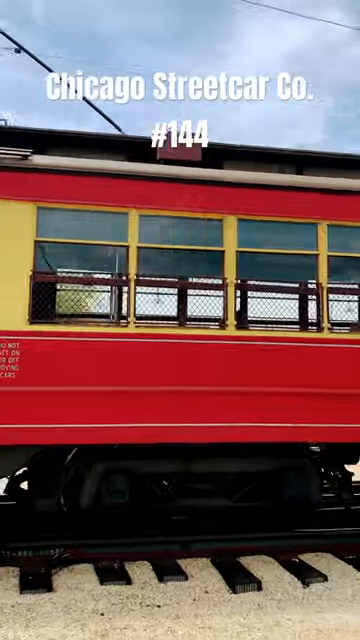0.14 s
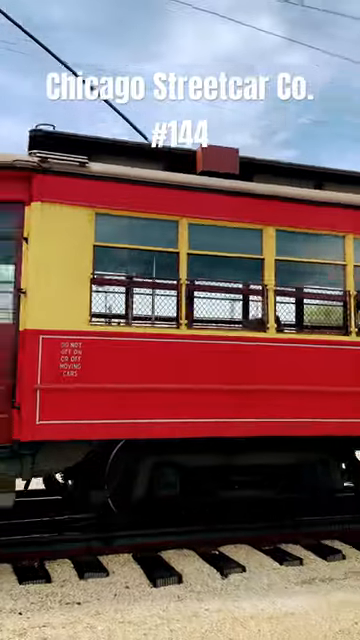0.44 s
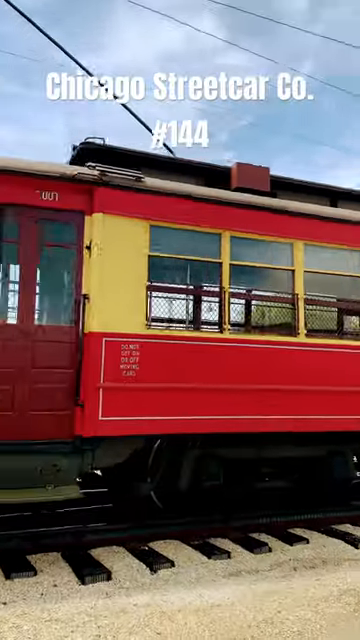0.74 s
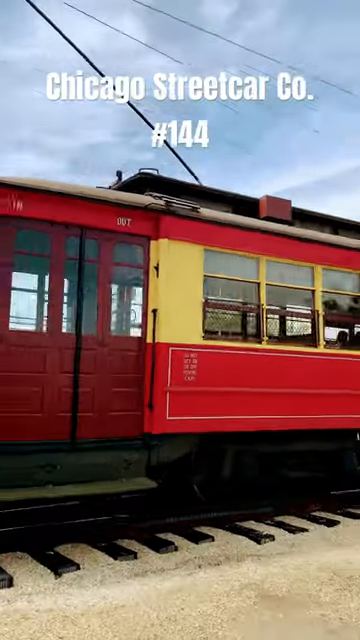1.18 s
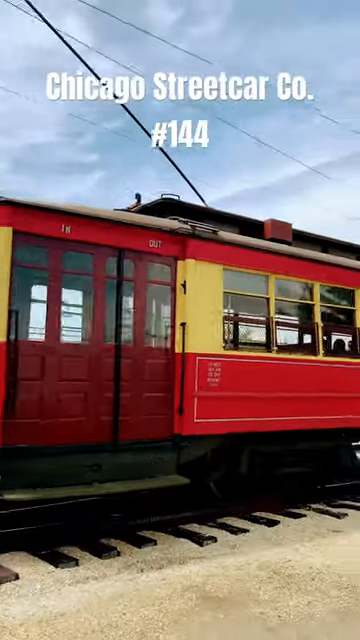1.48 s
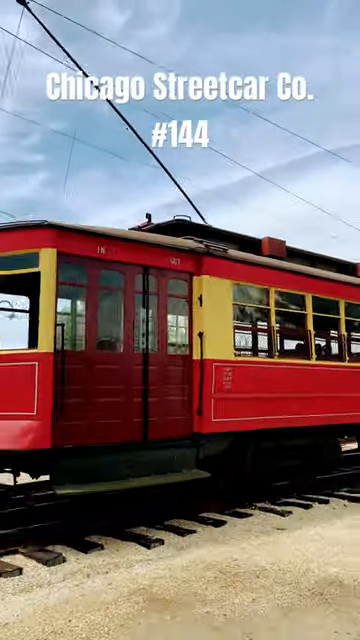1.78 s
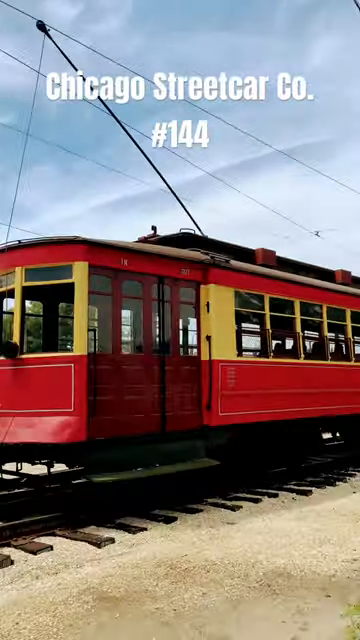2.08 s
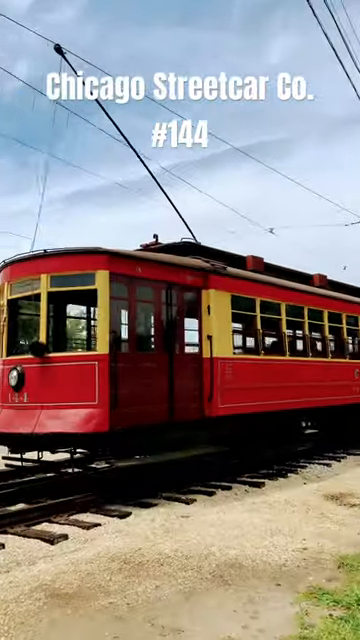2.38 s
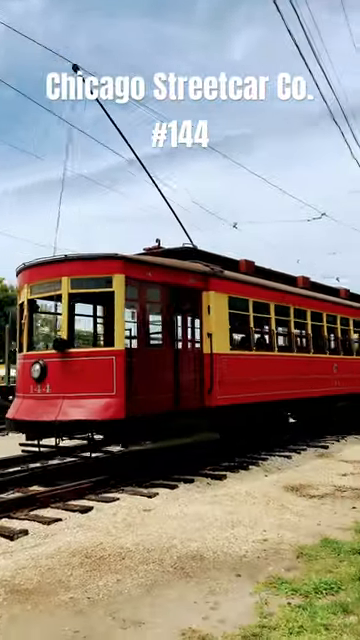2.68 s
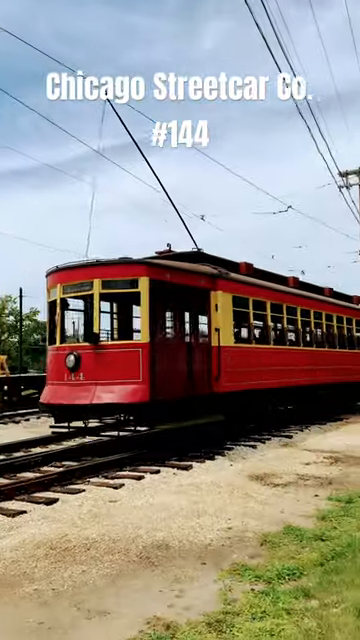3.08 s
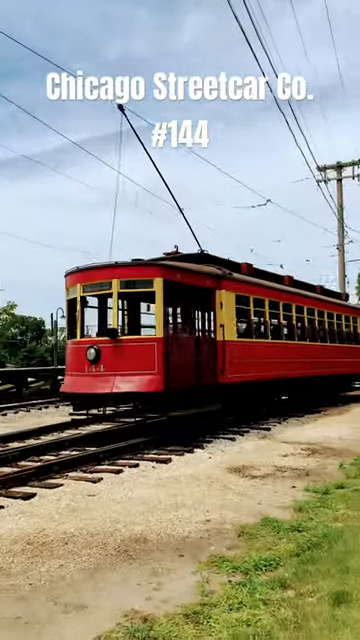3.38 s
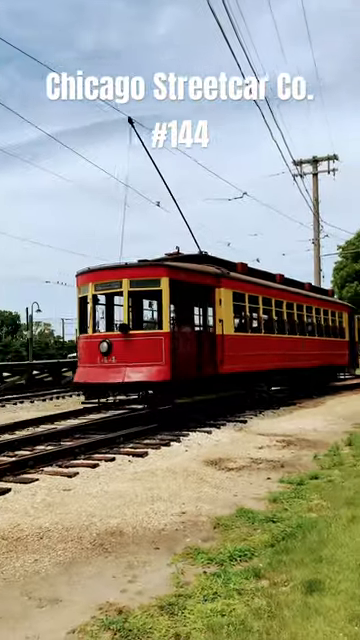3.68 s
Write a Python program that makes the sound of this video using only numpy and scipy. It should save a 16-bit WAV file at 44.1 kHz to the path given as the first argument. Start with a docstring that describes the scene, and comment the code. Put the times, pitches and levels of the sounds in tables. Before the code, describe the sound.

Close stereo pickup of a vintage tram on outdoor track: continuous body rumble, soft roar and hiss, irregular booming wheel knocks, loose fittings rattling, grit snapping early, short squeaks midway and a strong groan late.

```python
"""An old streetcar rolls slowly past outdoors, close to a two-port microphone.
Noise and tiny impacts, coloured by ground, body and wheels, make the rumble, roar and hiss; wheel knocks
add decaying booms, shudder and chatter. Stick-slip tones groan and squeak; narrow and broad bands ring.
Loose metal fittings chink as dense high rattle, and grit cracks under a wheel as short noise bursts.
The ports hear it with differing phase and balance, plus sound scattered by the moving car side."""
import sys
import numpy as np
from scipy import signal
from scipy.fft import rfft, irfft
from scipy.io import wavfile
from scipy.ndimage import uniform_filter1d

SR = 44100
rng = np.random.default_rng(int(sys.argv[2]) if len(sys.argv) > 2 else 0)


def generate_wav(sig):
    """Save sig (samples, or channels by samples) to the path in sys.argv[1] as 16-bit PCM at SR."""
    pcm = np.round(np.clip(np.atleast_2d(sig).T, -1, 1) * 32767).astype(np.int16)
    wavfile.write(sys.argv[1], SR, pcm)


N = 169344
T = np.arange(N) / SR  # time in s
HZ = np.fft.rfftfreq(N, 1 / SR)

# Ringing of wheels, flanges and panels, and two broad, breathy whistles near 4.5 kHz:
# peak_s, half_length_s, pitch_hz, width_hz, level_db
RINGS = [(1.254, 0.24, 368, 22, -28.5), (0.776, 0.097, 467, 18, -34.5), (3.12, 0.16, 467, 14, -36.5),
         (3.29, 0.25, 189, 9.7, -28.5), (3.69, 0.25, 291, 15, -31.5), (1.7, 3.9, 684, 41, -44.5),
         (2.6, 0.21, 4480, 750, -39), (3.75, 0.18, 4500, 750, -41)]
# Loose fittings struck: start_s, level_db (before CHINK_DB), rise_s, t60_s
CHINKS = [(0.174, -23, 0.0033, 0.13), (0.227, -26.5, 0.0052, 0.19), (.595, -40, .03, 0.43),
          (1.565, -32, 0.017, 0.12), (1.928, -29, .005, 0.26), (1.98, -31, .002, 0.14),
          (2.42, -45, 0.026, 0.33), (2.882, -38, .014, 0.39)]
# Grit under a wheel: start_s, snap_db, crumble_db
CRACKS = [(.6905, -15.5, -28), (.7355, -19.5, -34), (.782, -15, -26)]
# Flanges brushing the rail: peak_s, half_length_s, pitch_hz, level_db
SQUEAKS = [(1.761, 0.01, 1652, -32), (1.858, 0.014, 1625, -32), (3.113, 0.012, 4570, -33),
           (3.152, 0.015, 4570, -35)]
# Stick-slip of wheel and rail: peak_s, rise_s, fall_s, pitch_hz, glide_hz_per_s, level_db
GROANS = [(.12, 0.1, 0.036, 692, -11, -34.5), (.5, 0.052, 0.033, 686, 1.5, -33.5),
          (0.647, 0.04, 0.049, 681, 240, -23), (2.05, 0.023, 0.02, 690, 2.5, -32),
          (2.195, 0.041, 0.028, 688, 0, -31), (2.62, 0.025, 0.068, 690, 3, -37.5),
          (2.785, 0.042, 0.036, 679.5, -100, -30.5), (3.002, 0.065, 0.026, 469.6, 90, -15.5)]
# Wheels striking joints and dents: start_s, thud_db (before BOOM_DB, SHUDDER_DB), clack_db, t60_s, pitch_hz
KNOCKS = [(0.024, -14, -37, 0.09, 153), (.128, -20, -25, 0.14, 233), (.143, -9.5, -21.5, 0.1, 327),
          (.170, -11.5, -26, 0.32, 132.7), (0.446, -16, -28, 0.091, 106), (0.636, -15, -45, 0.21, 138),
          (1.116, -12, -24, 0.13, 192), (1.140, -12.5, -20.5, 0.08, 185), (1.408, -20.5, -25, 0.73, 202.3),
          (1.439, -19, -25.5, 0.27, 247), (1.476, -15.5, -28, 0.26, 143.6), (1.549, -15, -25, 0.27, 200),
          (1.611, -12.5, -32, .14, 154.5), (1.641, -17, -48, .08, 128), (1.88, -15.5, -21.5, 0.3, 300.5),
          (1.913, -19, -36, 1, 147), (2.068, -22, -24.5, 0.12, 143), (2.09, -15, -45, 0.17, 113),
          (2.309, -17, -27.5, 0.24, 125), (2.345, -16.5, -27.5, 0.24, 153), (2.478, -19.5, -32, 0.26, 131),
          (3.189, -17.5, -36, 0.18, 195), (3.429, -17.5, -31, 0.22, 190)]

# Rolling levels before jolts and trims, for ground, car body, wheel roar and rail hiss: time_s, level_db
GROUND_LEVEL = [(0, -31.5), (0.7, -26), (1.75, -32), (1.95, -25.5), (2.95, -27.5), (3.15, -33),
                (3.84, -31.5)]
BODY_LEVEL = [(0.0, -19), (0.35, -24), (0.58, -20), (0.96, -24), (1.48, -20.5), (1.67, -33), (1.89, -20.5),
              (2.06, -23), (2.31, -26), (2.45, -27), (2.69, -29), (2.85, -21), (3.31, -27), (3.84, -26.5)]
ROAR_LEVEL = [(0.0, -27.5), (0.2, -33.5), (0.59, -32), (0.77, -35), (1.1, -35), (1.85, -38.5), (1.96, -36),
              (2.69, -38.5), (3.0, -35.5), (3.84, -37.5)]
HISS_LEVEL = [(0, -33.5), (.55, -32), (.66, -31), (.82, -34), (.9, -37.5), (1.38, -39), (1.47, -35),
              (1.8, -36.5), (1.94, -31.5), (2.15, -36), (2.47, -34), (2.75, -36.5), (2.97, -33), (3.2, -35),
              (3.84, -36)]

# Relative spectra of each source: frequency_hz, level_db
CHINK_COLOUR = [(1000, -45), (5000, -0.5), (8500, -10), (10200, -0.5), (10900, 0), (12600, -2), (13600, -2),
                (14900, 0), (15700, -5.5)]
CRACK_COLOUR = [(800, 1), (2500, -4), (4200, 5), (5700, 6.5), (7500, 2), (10000, 0.5), (12500, -8),
                (15500, -15)]
SCRAPE_COLOUR = [(300, -12), (800, 3.5), (1800, -8), (4000, -23)]
SHUDDER_COLOUR = [(22, -41), (70, -13), (110, 0.5), (145, 12), (200, 0), (300, 1), (400, -7), (530, -22),
                  (1800, -80)]
CLACK_COLOUR = [(100, -30), (330, 11), (530, 2.5), (780, 8.5), (1100, 0.5), (1800, -2), (2700, -13.5),
                (6000, -17.5), (14000, -43)]
GROUND_COLOUR = [(15, -38), (30, -23), (48, 2.5), (62, 4), (78, 9), (100, 10), (130, -17), (250, -78)]
BODY_COLOUR = [(25, -45), (85, -15.5), (115, -6.5), (137, 2.5), (175, -4), (220, -6.5), (300, -8),
               (370, -11.5), (440, -19), (560, -24.5), (900, -34.5), (4000, -72)]
ROAR_COLOUR = [(40, -30), (250, 8), (480, -1.5), (580, -6), (700, 1.5), (850, 0), (1050, -4.5),
               (1500, -3.5), (2000, -7), (2700, -12), (5000, -58)]
HISS_COLOUR = [(1000, 6.5), (2200, 4.5), (3000, 4), (3800, 7), (5300, 4), (7100, 5), (8500, -2.5),
               (10200, -3.5), (12000, -11), (14300, -14.5), (15500, -33)]

# Steel resonances of small fittings and of wheels: frequency_hz, width_hz, boost_db
FITTING_MODES = [(10778, 25, 12), (11520, 90, 4), (12596, 90, 6), (14857, 16, 10)]
WHEEL_MODES = [(1163, 32, 3), (2080, 32, 4), (2494, 60, 4), (3468, 50, 4), (7077, 40, 4)]

# Phase between the two ports, positive where the left leads: frequency_hz, phase_rad
PORT_PHASE = [(20, 0), (1450, -.1), (1900, .9), (2600, 2.3), (3500, 1.6), (4050, 2.2), (4823, 3.14),
              (5600, 4.4), (6976, 6.28), (8957, 9.42), (11111, 12.57), (13092, 15.7), (15503, 18.9)]
# Level difference between the ports: frequency_hz, left_minus_right_db
PORT_BALANCE = [(50, -1.1), (260, -2), (370, -2), (480, 4.5), (580, -5), (680, -7.5), (820, 1),
                (1000, -0.7), (2500, -0.5), (4000, 2.1), (15000, -0.5)]
# Scattered sound against direct sound: frequency_hz, level_db
SCATTER = [(40, -8), (150, -21.5), (700, -17), (1200, -9), (2200, -5), (3200, -5), (4800, -28), (5700, -8),
           (7000, -17), (8000, -7), (9000, -32), (10000, -6), (15000, -11)]

CHINK_DB = 1
SNAP_T60_S, CRUMBLE_T60_S, CRUMBLE_TOP_HZ = 0.02, 0.26, 7000
SQUEAK_WAVER, SQUEAK_WAVER_HZ = 0.0082, 200  # fraction of the pitch, rate
GROAN_WAVER, GROAN_WAVER_HZ = 0.01, 70  # fraction of the pitch, rate
OCTAVE_DB, SCRAPE_DB = -31, -14
KNOCK_RISE_S, STEADY_S = 0.003, 0.0077
BOOM_DB, SHUDDER_DB = -3, -2
GRAIN_PER_S, GRAIN_SPREAD_DB = 900, 1.5
SCATTER_T60_S, SCATTER_SHIFT_HZ = 0.062, 37
BASS_CUT_HZ, EDGE_HZ = 40, 15800
OVERLOAD = 0.9  # ceiling of the soft overload, full scale = 1


def amp(db):
    """Decibels to gain."""
    return 10 ** (np.asarray(db) / 20)


def unit(x):
    """Scales to rms 1."""
    return x / np.sqrt(np.mean(x ** 2) + 1e-20)


def read(points):
    """A table over frequency, joined on a log axis."""
    f, value = np.transpose(points)
    return np.interp(np.log(HZ + 1), np.log(f + 1), value)


def level(points):
    """A dB curve over time as gain."""
    return amp(np.interp(T, *np.transpose(points)))


def colour(x, points):
    """Filters x by a relative spectrum, at rms 1."""
    return unit(irfft(rfft(x) * amp(read(points)), N))


def drift(rate_hz):
    """Slow chance movement up to a rate, at rms 1."""
    return unit(irfft(rfft(rng.standard_normal(N)) / (1 + (HZ / rate_hz) ** 4), N))


def grains(per_s, spread_db, smooth):
    """Tiny impacts of uneven size over a smooth share of noise."""
    struck = rng.random(N) < per_s / SR
    sign = rng.choice([-1, 1], N)
    size = amp(spread_db * np.minimum(rng.exponential(1, N), 4))
    return unit(struck * sign * size) + smooth * rng.standard_normal(N)


def blow(start, rise, t60):
    """Envelope of a quick rise and an exponential decay."""
    age = T - start
    return np.clip(age / rise, 0, 1) * amp(-60 * np.maximum(age - rise, 0) / t60)


def swell(peak, rise, fall):
    """A bell-shaped envelope with its own rise and fall."""
    return np.exp(-((T - peak) / np.where(T < peak, rise, fall)) ** 2)


def steady(x, window_s):
    """Evens out the level over a short window."""
    power = abs(uniform_filter1d(x ** 2, size=max(int(window_s * SR), 8)))
    return x / np.sqrt(power + 1e-12)


def patchy(x, depth_db, rate_hz):
    """Neighbouring bands swell and sink on their own."""
    spectrum, centres = rfft(x), np.linspace(0, SR / 2, 20)
    out = np.zeros(N)
    for hz in centres:
        band = np.maximum(1 - abs(HZ - hz) / centres[1], 0)  # overlapping triangles
        out += irfft(spectrum * band, N) * amp(depth_db * drift(rate_hz))
    return unit(out)


def steel(x, modes, ripple_db, spacing_hz):
    """A few clear resonances and many weak, close ones colour the sound."""
    smoother = np.hanning(int(spacing_hz / HZ[1]) + 3)
    ripple = unit(signal.oaconvolve(rng.standard_normal(len(HZ)), smoother, "same"))
    peaks = 1 + sum((amp(db) - 1) / (1 + 2j * (HZ - hz) / width) for hz, width, db in modes)
    return irfft(rfft(x) * peaks * amp(ripple_db * ripple), N)


def rings():
    """Resonances, narrow or broad, swell and fade as the car moves."""
    out = np.zeros(N)
    for s, half, hz, width, db in RINGS:
        turn = 2 * np.pi * hz * T
        ring = drift(width / 2) * np.sin(turn) + drift(width / 2) * np.cos(turn)
        out += amp(db) * swell(s, half, half) * ring
    return out


def chinks():
    """Small steel parts rattle with a high, dense ring."""
    force = amp(CHINK_DB) * sum(amp(db) * blow(s, rise, t60) for s, db, rise, t60 in CHINKS)
    impacts = colour(grains(per_s=3400, spread_db=-2.0, smooth=0.68), CHINK_COLOUR)
    rattle = steel(impacts, FITTING_MODES, ripple_db=6, spacing_hz=250)
    return force * patchy(steady(rattle, window_s=0.018), depth_db=4.5, rate_hz=150)


def cracks():
    """A grain of grit snaps, then crumbles more dully."""
    snap = sum(amp(db) * blow(s, 0.00026, SNAP_T60_S) for s, db, _ in CRACKS)
    crumble = sum(amp(db) * blow(s, 0.0053, CRUMBLE_T60_S) for s, _, db in CRACKS)
    crumbs = colour(grains(per_s=450, spread_db=0.5, smooth=1.0), CRACK_COLOUR)
    dull_crumbs = unit(irfft(rfft(crumbs) / np.hypot(1, HZ / CRUMBLE_TOP_HZ), N))
    return snap * colour(rng.standard_normal(N), CRACK_COLOUR) + crumble * dull_crumbs


def squeaks():
    """Flanges brush the rail in thin, unsteady tones."""
    wavering_time = np.cumsum(1 + SQUEAK_WAVER * drift(SQUEAK_WAVER_HZ)) / SR
    tones = np.zeros(N)
    for s, half, hz, db in SQUEAKS:
        tone = np.sqrt(2) * np.sin(2 * np.pi * hz * wavering_time)
        tones += amp(db) * swell(s, half, half) * tone
    return tones * amp(2 * drift(rate_hz=130))


def groans():
    """A slipping wheel builds up one low mode, then lets go; it flutters, and scrapes once in every cycle."""
    out, waver = np.zeros(N), 1 + GROAN_WAVER * drift(GROAN_WAVER_HZ)
    scrape = amp(SCRAPE_DB) * colour(rng.standard_normal(N), SCRAPE_COLOUR)
    for s, rise, fall, hz, glide, db in GROANS:
        turn = 2 * np.pi * np.cumsum((hz + glide * (T - s)) * waver) / SR
        tone = np.sqrt(2) * (np.sin(turn) + amp(OCTAVE_DB) * np.sin(2 * turn))
        out += amp(db) * swell(s, rise, fall) * (tone + scrape * (1 + np.cos(turn)))
    return out * amp(0.7 * drift(rate_hz=90))


def knocks():
    """Each blow booms in one panel and shakes the whole truck, while the wheel clacks and chatters."""
    shudder = steady(colour(grains(per_s=500, spread_db=2.0, smooth=0.63), SHUDDER_COLOUR), STEADY_S)
    chatter = steady(colour(grains(per_s=700, spread_db=0.5, smooth=0.96), CLACK_COLOUR), STEADY_S)
    wobble = 0.52 * drift(rate_hz=28)  # phase in radians
    boom, thud_power, clack_power = np.zeros(N), np.zeros(N), np.zeros(N)
    for s, thud_db, clack_db, t60, hz in KNOCKS:
        force = blow(s, KNOCK_RISE_S, t60)
        boom += amp(thud_db) * force * np.sin(2 * np.pi * hz * (T - s) + wobble)
        thud_power += (amp(thud_db) * force) ** 2  # overlapping blows add as power
        clack_power += (amp(clack_db) * force) ** 2
    shaking = amp(SHUDDER_DB) * np.sqrt(thud_power) * shudder
    return amp(BOOM_DB) * boom + shaking + np.sqrt(clack_power) * chatter


def ground_rumble():
    """Rough rail drives the ground: steadied low noise."""
    return level(GROUND_LEVEL) * steady(colour(rng.standard_normal(N), GROUND_COLOUR), window_s=0.098)


def body_rumble(jolt):
    """Rough rail drives the car body: small impacts rumble in its low resonances."""
    impacts = grains(GRAIN_PER_S, GRAIN_SPREAD_DB, smooth=0.74)
    rumble = steady(colour(impacts, BODY_COLOUR), window_s=0.09)
    return level(BODY_LEVEL) * amp(-0.5 + 1.05 * jolt) * rumble


def wheel_roar(jolt):
    """Rough rail drives the wheels: small impacts roar in the middle range."""
    impacts = grains(GRAIN_PER_S, GRAIN_SPREAD_DB, smooth=0.92)
    return level(ROAR_LEVEL) * amp(0.64 * jolt) * colour(impacts, ROAR_COLOUR)


def rail_hiss(jolt):
    """The contact of steel on steel hisses unevenly across the treble."""
    fizz = colour(grains(per_s=1500, spread_db=2.5, smooth=1.5), HISS_COLOUR)
    return level(HISS_LEVEL) * amp(0.5 * jolt) * patchy(fizz, depth_db=1.7, rate_hz=14)


def rolling():
    """Body, roar and hiss share the same jolts; roar and hiss sound through the steel of the wheels."""
    jolt = drift(rate_hz=9.5)
    wheels = steel(wheel_roar(jolt) + rail_hiss(jolt), WHEEL_MODES, ripple_db=2.0, spacing_hz=68.6)
    return ground_rumble() + body_rumble(jolt) + wheels


def scattering(car):
    """The moving car side returns short, shifting scatter, different at each port; gives spectra."""
    scattered = 0
    for _ in range(3):
        taps = rng.standard_normal((2, N)) * blow(0.00077, 0.0019, SCATTER_T60_S)
        taps = taps / np.linalg.norm(taps, axis=1, keepdims=True)
        shifting = car * np.array([drift(SCATTER_SHIFT_HZ), drift(SCATTER_SHIFT_HZ)])
        scattered = scattered + rfft(shifting) * rfft(taps) / np.sqrt(3)
    return scattered


def scene():
    """The car close by: direct sound with a phase offset between ports, blended with its scatter."""
    car = rings() + chinks() + cracks() + squeaks() + groans() + knocks() + rolling()
    side = np.array([[0.5], [-0.5]])  # left, right: half of each difference
    direct = rfft(car) * np.exp(1j * side * read(PORT_PHASE))
    share = amp(read(SCATTER))
    blend = (direct + scattering(car) * share) / np.hypot(1, share)
    return irfft(blend * amp(side * read(PORT_BALANCE)), N)


def record(dry):
    """The microphone's bass roll-off, a soft overload of the highest peaks, and the band limit."""
    thinned = irfft(rfft(dry) * HZ ** 6 / np.hypot(HZ ** 6, BASS_CUT_HZ ** 6), N)
    rounded = thinned / (1 + (thinned / OVERLOAD) ** 4) ** 0.25
    band_limit = signal.firwin(511, EDGE_HZ, window=("kaiser", 9), fs=SR)
    return signal.oaconvolve(rounded, band_limit[None], "same")


dry = scene()
out = record(dry)
generate_wav(out)
```